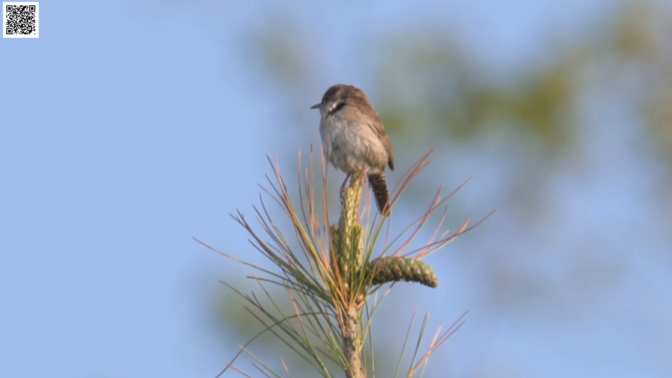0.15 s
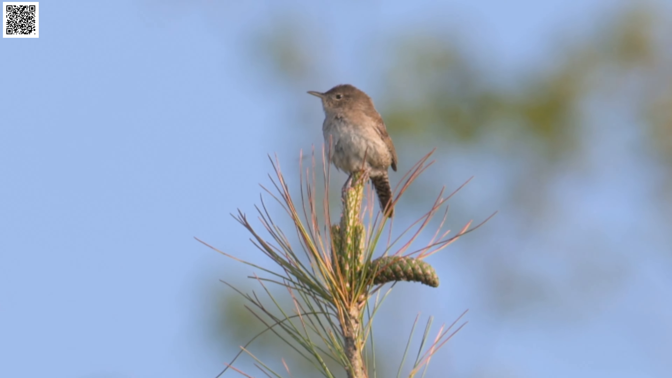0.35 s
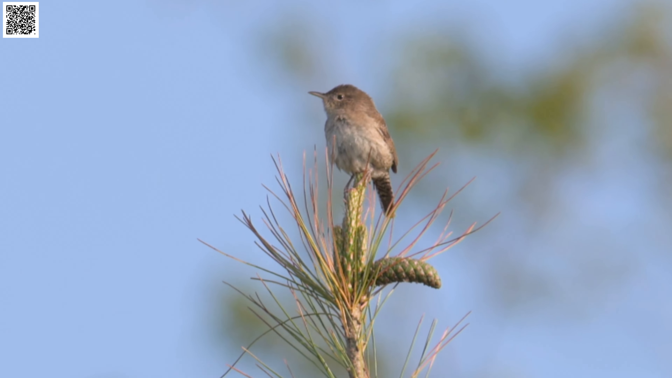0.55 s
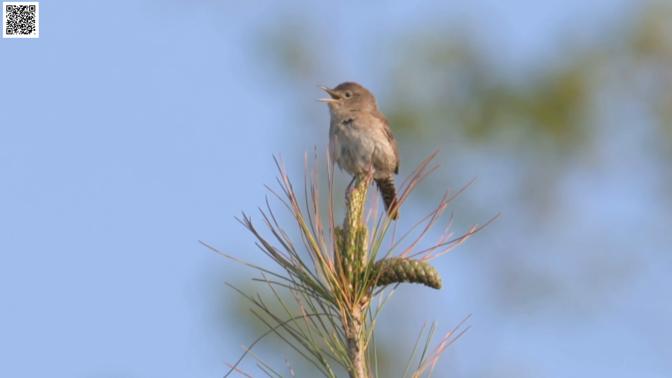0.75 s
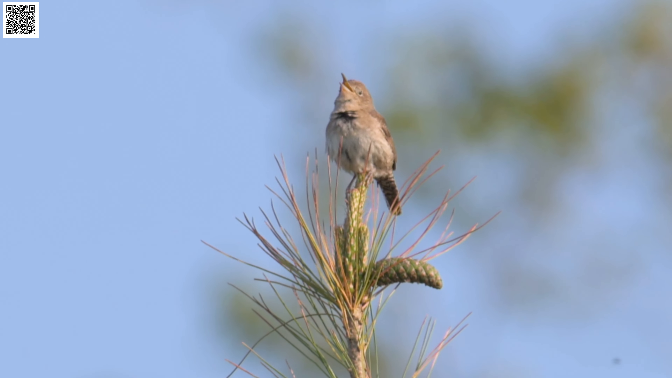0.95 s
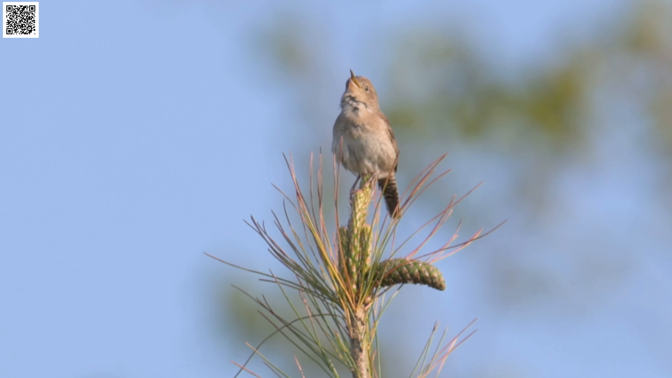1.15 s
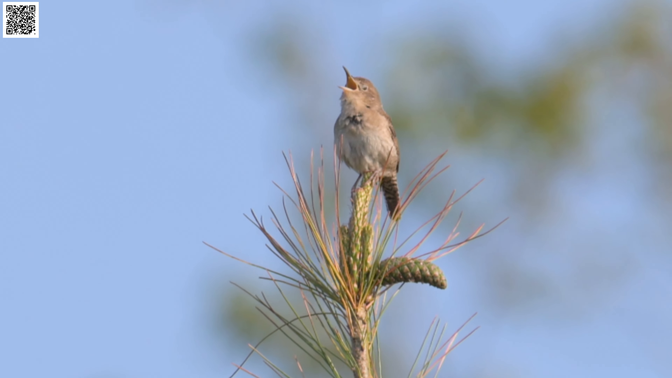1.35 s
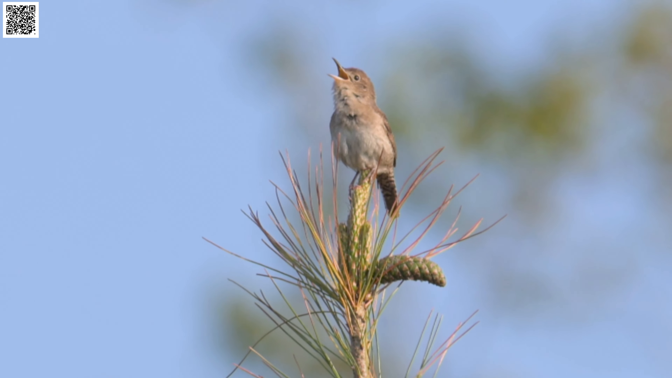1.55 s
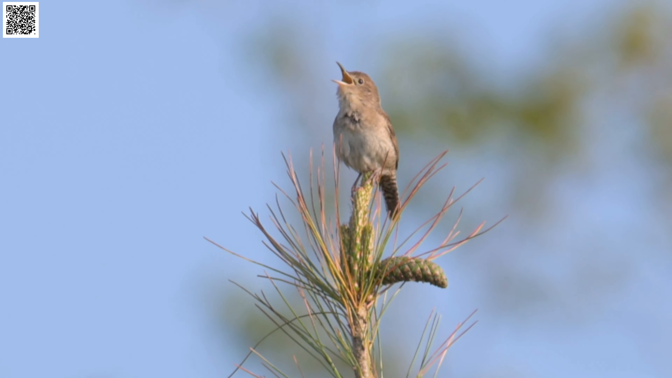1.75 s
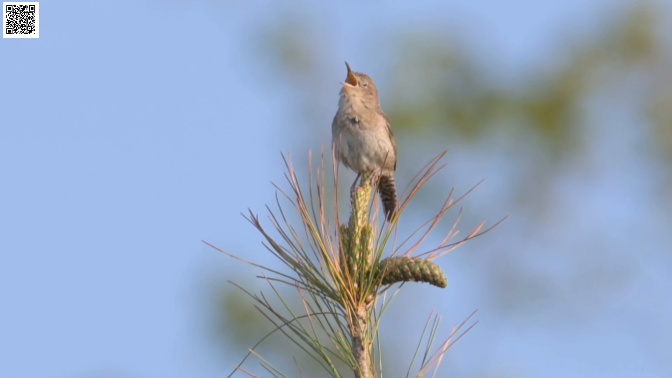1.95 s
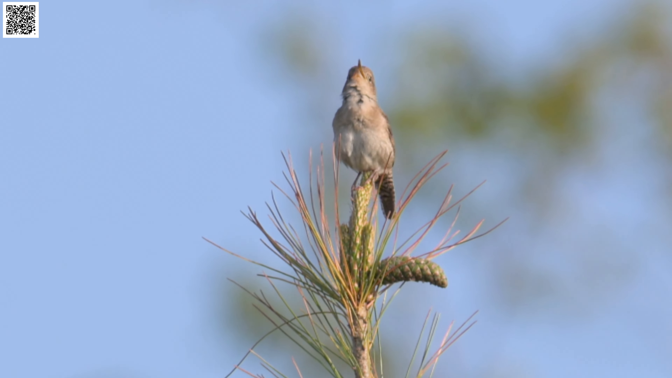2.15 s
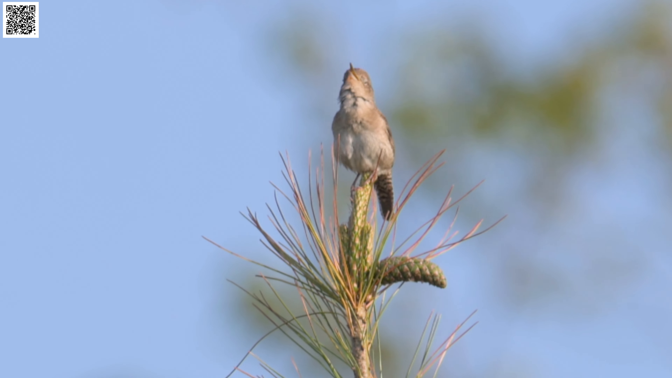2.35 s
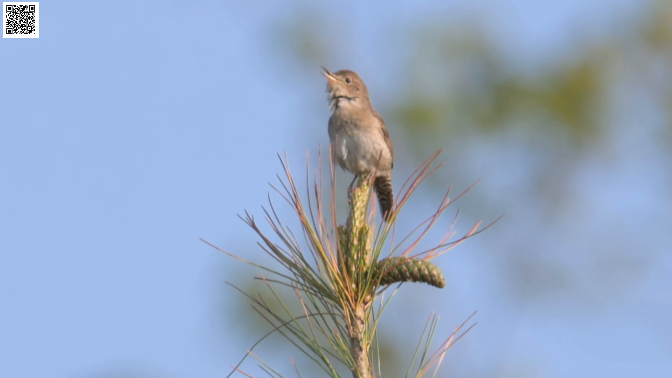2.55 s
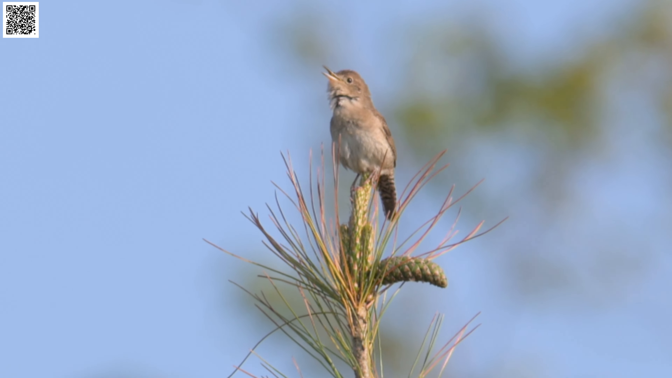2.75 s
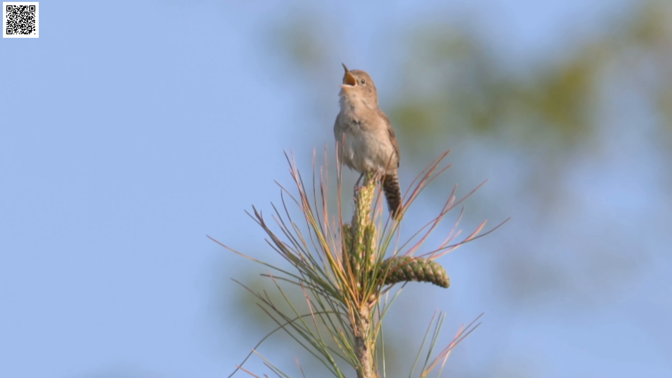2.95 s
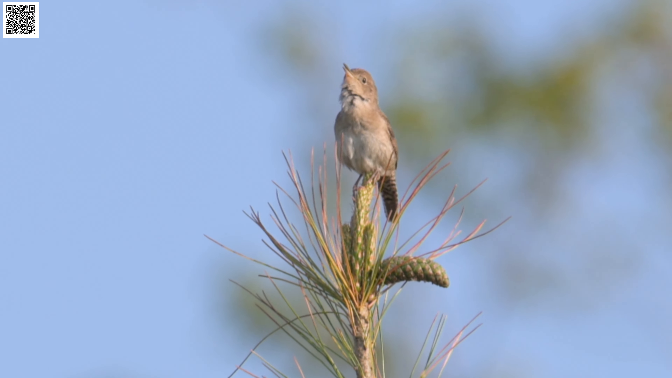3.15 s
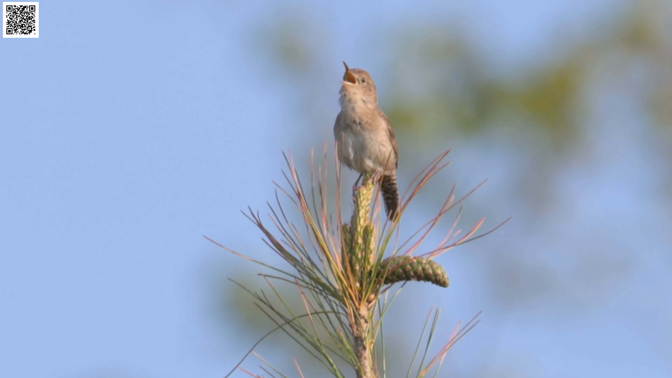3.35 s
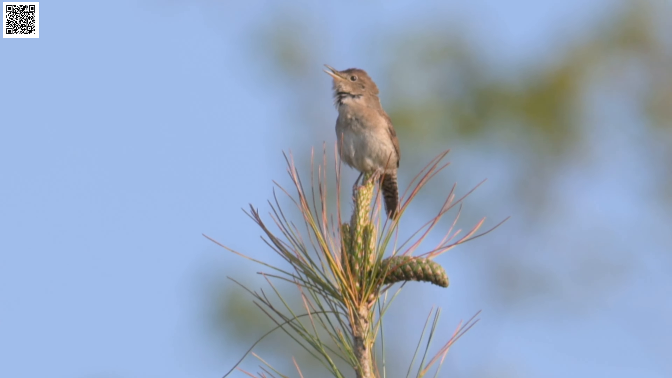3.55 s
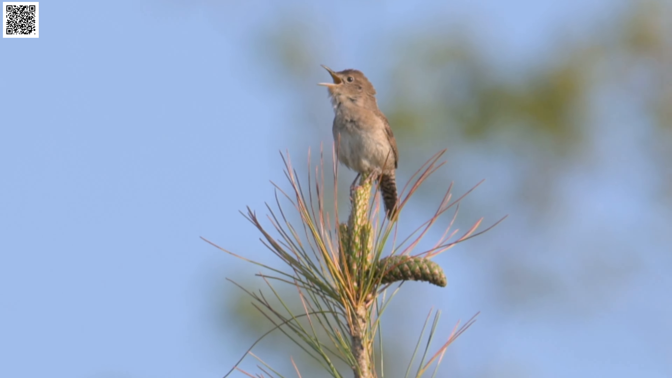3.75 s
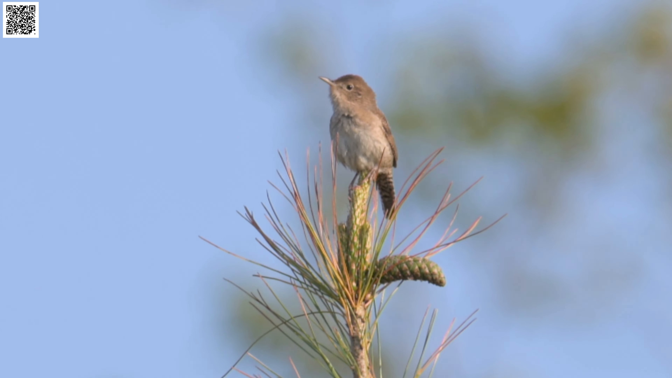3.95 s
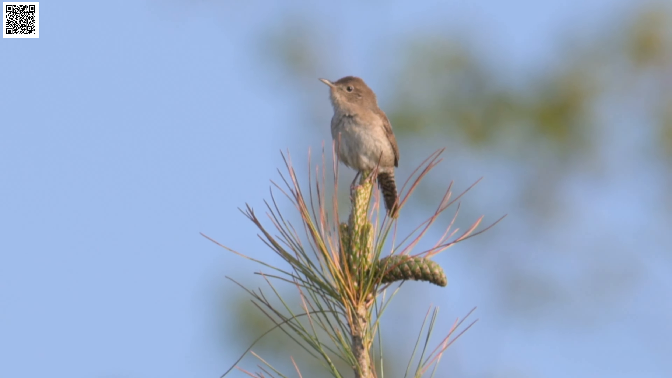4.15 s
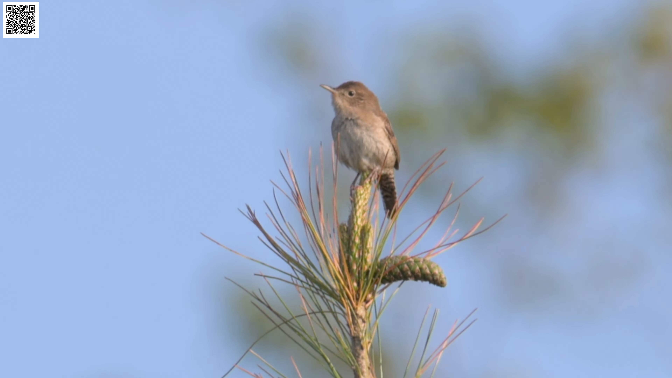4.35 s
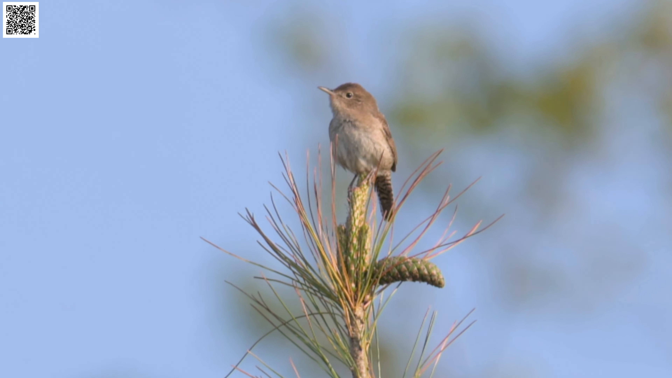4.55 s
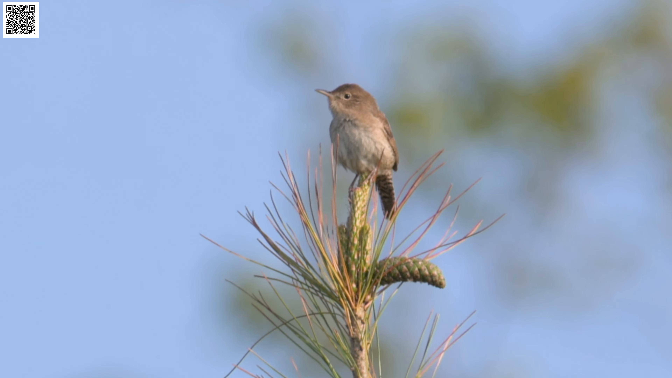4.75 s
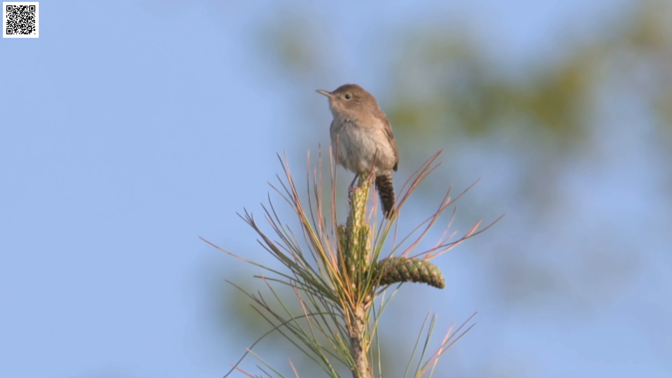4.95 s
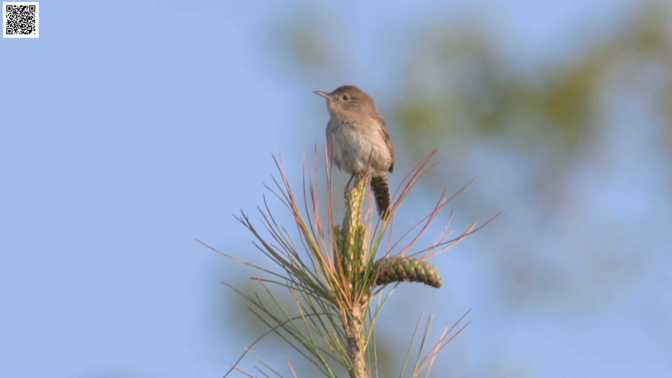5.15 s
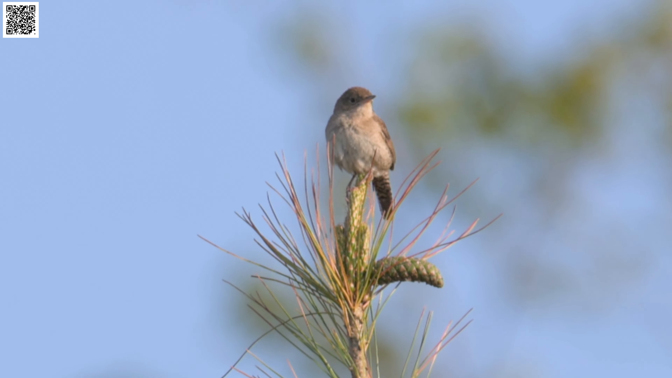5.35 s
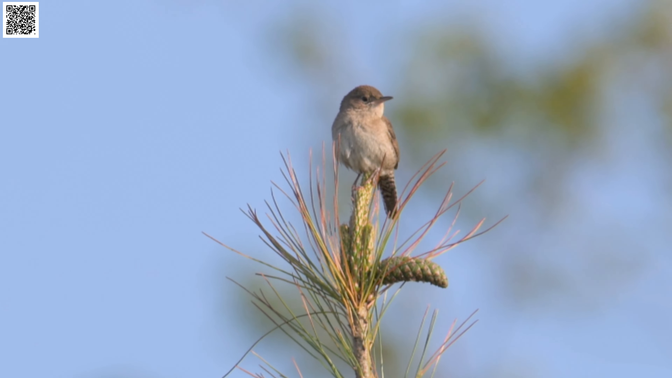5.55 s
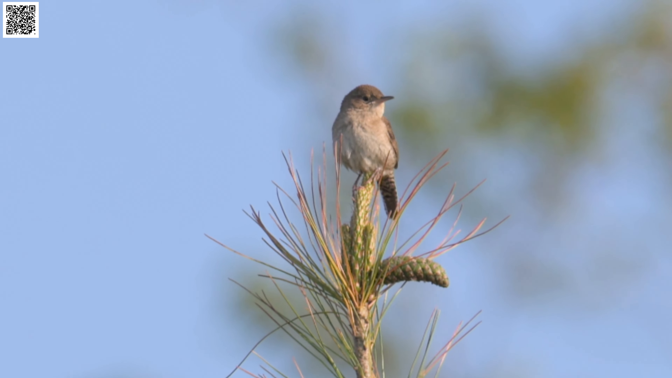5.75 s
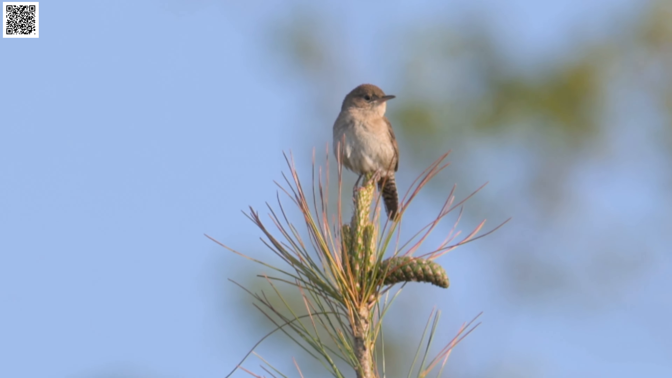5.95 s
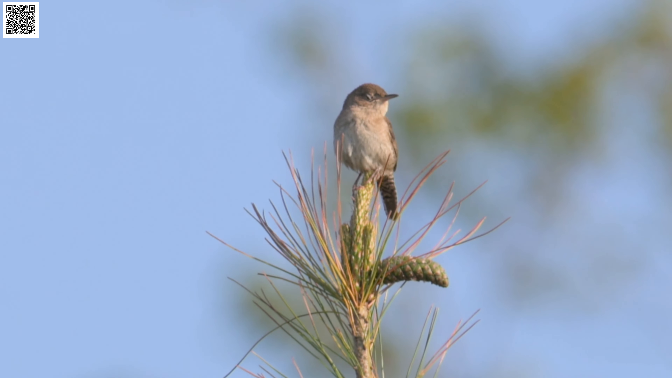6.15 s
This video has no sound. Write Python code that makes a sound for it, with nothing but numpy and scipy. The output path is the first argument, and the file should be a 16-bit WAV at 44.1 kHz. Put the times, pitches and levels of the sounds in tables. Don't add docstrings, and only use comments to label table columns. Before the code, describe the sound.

Outdoors, a nearby wren stutters, warbles, trills rapidly and ends in a two-note rattle; then faint birds, low hum and two wind thumps.

```python
import sys
import numpy as np
from scipy import signal
from scipy.fft import rfft, irfft
from scipy.io import wavfile
from scipy.ndimage import uniform_filter1d

SR = 44100
rng = np.random.default_rng(int(sys.argv[2]) if len(sys.argv) > 2 else 0)


def volts_from_decibels(level):
    exponent = np.asarray(level, float) / 20
    return 10 ** exponent


def generate_wav(signal):
    frames = np.transpose(np.atleast_2d(signal))
    scaled = np.clip(frames, -1, 1) * 32767
    pcm = np.round(scaled).astype(np.int16)
    wavfile.write(sys.argv[1], SR, pcm)


N = 273420

# time in seconds, hum level in dB.
TRAFFIC_LEVEL = [(0, -53.5), (1.5, -54), (3, -54), (4.2, -51), (5, -53), (6.2, -53.5)]
# frequency in Hz, density in dB per Hz.
AIR_SPECTRUM = [(82, -44), (140, -1.5), (188, -3.5), (258, 0.5), (475, -7), (639, -3), (985, -4.5),
                (1270, -9.5), (1610, -17), (2130, -23), (4240, -24.5), (7960, -33), (9510, -35),
                (10900, -32.5), (15600, -46)]
# frequency in Hz, side minus mid in dB.
AIR_WIDTH = [(120, -28), (250, -26), (500, -22), (900, -15), (1400, -2.5), (2500, 4), (12000, -0.5)]
# frequency in Hz, density in dB per Hz.
BUFFET_SPECTRUM = [(12, -51), (20, -12), (49, 0.5), (139, -4.5), (167, -11.5), (200, -23), (260, -82),
                   (440, -120)]
# time in seconds, level in dB.
GUST_LEVEL = [(0, -50), (.5, -52), (1.85, -52), (2.45, -49), (2.9, -52), (3.5, -53), (4.1, -52.5),
              (4.4, -52), (5.0, -53.5), (5.9, -51), (6.2, -48.5)]
# time in seconds, peak in dB, width in seconds, delay of the recoil in seconds.
KNOCKS = [
    (4.743, -34, .003, .007),
    (4.7905, -15.3, .0012, .0028),
    (4.806, -31, .002, -.005),
    (4.8435, -17.5, .0018, -.0035),
    (4.854, -34, .002, .0005),
    (1.952, -33, .0025, .006),
    (2.287, -35, .002, -.008),
    (.64, -33, .003, .007),
    (3.05, -33, .004, .009),
]

# start in seconds, length in seconds, start in Hz, end in Hz, level in dB.
FAR_FALLS = [(.287, .105, 7000, 3300, -61), (1.335, .065, 7700, 4600, -57), (1.475, .058, 7000, 4300, -51),
             (5.07, .057, 4230, 3970, -60), (3.95, .06, 4650, 3000, -66), (.5, .07, 3900, 2650, -69),
             (.793, .018, 7200, 6500, -62), (5.255, .04, 3100, 2750, -66), (5.822, .085, 6050, 3400, -57.5),
             (5.92, .045, 3500, 2800, -67), (4.595, .03, 3420, 3340, -67), (6.03, .062, 4200, 2700, -63),
             (4.92, .03, 5950, 5850, -69), (5.545, .022, 4450, 4000, -68), (5.565, .04, 7150, 6500, -69),
             (5.676, .012, 4000, 3700, -64), (5.808, .032, 3550, 2900, -68), (5.815, .025, 6750, 6300, -68),
             (6.03, .022, 6900, 6500, -69), (6.17, .03, 4000, 3200, -67)]
FAR_HOOKS = [(4.98, .045, 5550, 4800, -63), (5.115, .06, 6600, 4750, -64), (5.268, .068, 7400, 4500, -61.5)]
FAR_RISES = [(0, .02, 6050, 7100, -60), (.178, .038, 4100, 7200, -61), (.415, .028, 2900, 4100, -67),
             (4.382, .06, 5150, 5750, -64), (4.793, .012, 3200, 3400, -64), (5.255, .03, 3900, 4480, -65),
             (5.69, .035, 4400, 7100, -64), (4.035, .045, 3000, 3500, -70), (.58, .04, 2650, 3350, -69),
             (.81, .035, 2400, 2800, -65), (5.85, .022, 5500, 5700, -68), (1.045, .06, 6500, 7300, -64),
             (1.235, .03, 6200, 7000, -60)]
FAR_EASES = [(.345, .048, 4450, 5150, -60), (.292, .035, 5600, 6700, -62), (5.494, .03, 4400, 6300, -65),
             (.398, .045, 5900, 6200, -65)]
# start in seconds, length in seconds, both ends in Hz, turn in Hz, level in dB.
FAR_ARCHES = [(.228, .05, 5550, 4700, -62), (4.445, .045, 6300, 7050, -62), (4.757, .033, 2920, 2800, -62),
              (4.61, .07, 3800, 3950, -69), (5.155, .05, 3020, 3080, -69), (5.23, .035, 5650, 5850, -62),
              (5.62, .03, 5950, 5600, -65), (5.688, .087, 3900, 4060, -61), (.458, .022, 3300, 3450, -66),
              (.04, .08, 4900, 4920, -70), (5.08, .025, 5650, 5700, -67), (.87, .03, 3100, 3250, -69),
              (4.92, .018, 2700, 2950, -70)]
# seconds from start, pitch in Hz, level in dB.
LOOP_SHAPE = [(0, 3300, -68), (.02, 3600, -63), (.04, 4300, -61), (.055, 5100, -56), (.065, 5600, -57),
              (.073, 5300, -58), (.08, 4500, -57), (.088, 4000, -68)]
VEE_SHAPE = [(0, 5680, -63), (.008, 5708, -51.5), (.02, 5154, -53), (.032, 4799, -45), (.04, 5005, -55),
             (.055, 5803, -48), (.066, 6383, -54), (.09, 6275, -58.5), (.094, 6250, -73)]
VEE_TAIL_SHAPE = [(.095, 4100, -57), (.11, 4550, -52.5), (.125, 4855, -45.5), (.15, 4810, -70),
                  (.16, 4780, -70)]
SWOOP_SHAPE = [(0, 7900, -50), (.008, 7700, -43), (.018, 7000, -45), (.03, 6050, -43), (.042, 5550, -46),
               (.052, 5000, -46), (.066, 4400, -46), (.07, 4300, -60)]
WAVER_SHAPE = [(0, 3250, -66), (.01, 2880, -53), (.02, 2620, -58), (.028, 2500, -60), (.037, 2700, -61),
               (.046, 3000, -63), (.056, 2750, -63), (.065, 2950, -66)]
CURL_SHAPE = [(0, 3100, -64), (.012, 3334, -54.5), (.024, 3310, -59), (.034, 2880, -55), (.046, 2660, -57),
              (.06, 2510, -61), (.083, 2470, -62), (.092, 2900, -66)]
# seconds from start, pitch in Hz, level in dB, warble depth in Hz.
SEE_SHAPE = [(0, 8470, -75, 0), (.008, 8400, -46, 0), (.04, 7920, -39.5, 87), (.065, 7740, -47, 62),
             (.085, 7000, -36, -4), (.1, 6160, -42, 14), (.112, 6350, -68, 7)]
# start in seconds, level in dB, pitch factor.
LOOP_TIMES = [(.09, 1, 0.99), (5.397, -4, 1), (5.597, -2, .98)]
VEE_TIMES = [(.47, 0.11, 0.97), (.687, 1.3, 1), (0.898, 2.4, 1.001), (1.11, 2.4, 0.95)]
VEE_TAIL_TIMES = [(.47, 0.1, 0.99), (.687, 1.2, 1), (.905, 1.5, 0.97), (1.108, 3.0, 0.97)]
SEE_TIMES = [(3.775, -24, 0.94), (3.925, -11.5, 0.99), (4.082, -5, 1.019), (4.234, -4.5, 1.015)]
ONE_OFF_TIMES = [
    (4.836, 0, 1),
    (4.931, 0, 1),
    (1.606, 0, 1),
]

# start in seconds, level in dB.
STUTTERS = [(.753, -57), (.825, -53), (.903, -53)]
BUZZES = [(1.295, -46.5), (1.373, -44.5), (1.453, -43)]
# length in seconds, start, middle and end in Hz.
STUTTER_SHAPE = (.034, 850, 950, 680)
BUZZ_SHAPE = (0.028, 930, 855, 690)
# time in seconds, peak in dB, length in seconds.
PUFFS = [(.778, -62, 0.005), (.852, -59, .007), (.928, -58, 0.0064), (.98, -62, .005), (1.082, -63, 0.0074),
         (1.137, -56, .004), (1.177, -47, 0.0065), (1.305, -52, 0.012), (1.385, -48, 0.013),
         (1.464, -49, .011), (1.55, -54, .008), (1.635, -56, .008), (1.82, -57, .01), (1.945, -57, .01),
         (2.07, -57, .01), (2.426, -49, .002), (2.51, -53, .002), (2.552, -54, .002),
         (2.635, -46.5, 0.0018), (2.8, -55, 0.0018), (2.842, -51, .002), (2.918, -50, 0.009),
         (3.012, -50, .007)]
# start in seconds, length in seconds, start in Hz, end in Hz, level in dB.
CHATTER = [(.974, .04, 5900, 3900, -40)]
RASP = [(1.073, .022, 1150, 760, -50.5)]
CLEAR_NOTES = [(1.222, .014, 2300, 2250, -55), (1.232, 0.019, 2300, 3200, -46.5),
               (1.245, 0.0215, 3300, 3620, -39), (1.15, .03, 6550, 5800, -57),
               (1.544, 0.0107, 5100, 6900, -46), (1.546, .012, 3350, 3050, -45),
               (1.168, .012, 8800, 8100, -40), (1.142, .03, 13050, 12800, -67)]
SPLIT_NOTES = [(1.327, 0.022, 2850, 2680, -35), (1.398, 0.03, 2840, 2710, -32.5),
               (1.479, 0.03, 2820, 2600, -34)]
THIRDS = [(1.591, 0.037, 1090, 1850, -37), (1.549, 0.015, 1800, 1150, -34)]
# start in seconds, length in seconds, start, middle and end in Hz, level in dB.
HIGH_ARCH = [(1.138, 0.044, 9100, 10700, 8300, -55)]
SCOOPS = [(1.532, .014, 2480, 2660, 2500, -35), (1.628, .024, 2150, 2210, 1740, -30),
          (1.139, 0.041, 4250, 4330, 3700, -55)]
# seconds from start, pitch in Hz, level in dB.
HOOK_SHAPE = [(.002, 5650, -41), (.009, 5270, -33), (.013, 4480, -38), (.016, 4980, -37),
              (.02, 5650, -32.5), (.027, 6500, -28.5), (.033, 6940, -33), (.039, 7030, -37),
              (.043, 7300, -45)]
DIP_SHAPE = [(-.002, 5260, -59), (0, 5020, -48.5), (.004, 4010, -29), (.007, 3630, -24.5),
             (.012, 3230, -28), (.018, 2780, -32), (.021, 2650, -37.5), (.024, 2510, -61)]
STEP_UP_SHAPE = [(.002, 3816, -49), (.013, 3674, -25.5), (.016, 3336, -35), (.022, 3160, -47),
                 (.027, 4072, -27), (.0405, 4390, -22.5), (.042, 4950, -26), (.045, 5510, -40),
                 (.048, 5580, -37)]
# seconds from start, pitch in Hz, level in dB, warble depth in Hz.
HIGH_SLIDE_SHAPE = [(0, 8530, -62, 6), (.008, 8750, -60, 3), (.017, 9860, -55, 30), (.03, 9650, -48.5, 250),
                    (.045, 8500, -52, 480), (.063, 6900, -37, 500), (.076, 6300, -33, 350),
                    (.086, 6150, -38, 100), (.092, 5800, -64, 0)]
SHAKE_SHAPE = [(0, 5000, -54, 395), (.005, 5035, -36.5, 453), (.014, 4930, -30, 403),
               (.025, 5056, -28, 378), (.029, 4610, -25, 40), (.033, 4530, -28, 0), (.037, 4000, -25, -2),
               (.041, 3610, -38, 0), (.045, 3230, -41, 0)]
WARBLE_SHAPE = [(.002, 2895, -48, 9), (.009, 2846, -36, 58), (.013, 3146, -35, 195),
                (.022, 3224, -30.5, 297), (.03, 3360, -34, 351), (.034, 3004, -31, 19),
                (.038, 2650, -30, -2), (.042, 2226, -44, -24), (.046, 2037, -40, 0)]
# start in seconds, level in dB, pitch factor.
HIGH_SLIDE_TIMES = [(1.676, .3, 1)]
SHAKE_TIMES = [(1.7876, -2, 1.002), (1.9133, 0, 1), (2.037, 0.1, 1.006)]
HOOK_TIMES = [(1.85, 0.24, 1.003), (1.978, -0.18, 0.993)]
# start in seconds, level in dB.
TRILL_NOTES = [(2.1023, -3), (2.143, -1.5), (2.1836, -1.5), (2.2248, 0), (2.2647, 0.5), (2.3054, 0),
               (2.346, 0), (2.3856, -2.5), (2.427, 0), (2.467, -0.5), (2.509, -.6), (2.5513, 0),
               (2.5931, -0.5), (2.6335, -0.5), (2.674, -2), (2.716, -0.7), (2.756, -1), (2.7985, -0.5),
               (2.841, 0.5)]
# start in seconds, level in dB, pitch factor of the step, pitch factor of the warble.
RATTLE_NOTES = [(2.875, 0.5, 1.065, 1.064), (3.005, -0.3, 1.064, 1.034), (3.135, -0.4, 1.028, 1.014),
                (3.2672, -0.9, 0.98, 0.99), (3.3992, -0.7, 0.98, 1.014), (3.5328, -0.6, 0.992, .999),
                (3.6663, -2, 0.98, 0.98), (3.8014, -2.5, 0.96, .99)]
# time in seconds, left over right in dB.
HEAD_TURN = [(.7, -.2), (1.3, .5), (1.9, 1), (2.2, -.6), (2.8, -.8), (3.1, .2), (3.9, 0)]
# time in seconds, peak in dB, length in seconds.
HOUSING_TICKS = [(4.598, -51, .008), (5.358, -57, .006), (5.727, -47.5, .009), (5.811, -49.5, .008),
                 (6.095, -58, .003), (6.179, -50, .005)]


def at_hz(points, hz):
    table_hz, level_db = np.transpose(points)
    return np.interp(np.log(hz), np.log(table_hz), level_db)


def in_time(rows):
    s, value = np.transpose(rows)
    return np.interp(np.arange(N) / SR, s, value)


def rms_one(x):
    return x / np.sqrt(np.mean(x ** 2) + 1e-20)


def drift(rate_hz, size=N):
    return np.interp(np.arange(size) * rate_hz / SR, np.arange(size), rng.standard_normal(size))


def add(track, s, sound):
    i = max(round(s * SR), 0)
    track[i:i + len(sound)] += sound[:N - i]


def band(x, low_hz, high_hz, order=2):
    return signal.sosfilt(signal.butter(order, [low_hz, high_hz], "band", fs=SR, output="sos"), x)


def capsule(x, hz=11000, width_hz=2200, lift=1.6):
    r = np.exp(-np.pi * width_hz / SR)
    zeros = np.array([1, 0, -1]) * (1 - r * r) / 2
    poles = [1, -2 * r * np.cos(2 * np.pi * hz / SR), r * r]
    return x + lift * signal.lfilter(zeros, poles, x)


def placed(x, pan_db, lag):
    return np.array([np.roll(x, lag) * volts_from_decibels(pan_db / 2), x * volts_from_decibels(-pan_db / 2)])


def woodland(x, t60, gap_s):
    t = np.arange(int(.7 * SR)) / SR
    tail = rng.standard_normal((2, len(t))) * volts_from_decibels(-60 * t / t60) * np.clip(t / gap_s, 0, 1)
    tail /= np.sqrt(np.mean(np.sum(tail ** 2, axis=1)))
    return signal.fftconvolve(x[None], tail, axes=1)[:, :N]


def voice(hz, level_db, partials_db, rough):
    size = len(hz)
    hz = hz * (1 + 0.0084 * drift(320, size))
    phase = 2 * np.pi * np.cumsum(hz) / SR
    tone = 0
    for k, db in enumerate(partials_db(hz), 1):
        height = volts_from_decibels(db + rough * np.tanh(drift(397, size)))
        height = height * (k * hz < .45 * SR)
        tone = tone + height * np.sin(k * phase + 2 * np.pi * rng.random())
    return volts_from_decibels(level_db) * tone


def phrases(shape, events, warble_hz=0., partials_db=(0, -44, -41), rough=1.5):
    edge_s, beak_db_per_khz = .002, 7
    out = np.zeros(N)
    s, *columns = np.transpose(shape)
    t = np.arange(s.min() * SR, s.max() * SR) / SR
    hz, level_db, *depth = (uniform_filter1d(np.interp(t, s, c), size=45) for c in columns)
    tremor = sum(depth) * np.cos(2 * np.pi * warble_hz * (t - .003))
    path = hz + tremor
    level_db = level_db - 0.0025 * tremor
    middle = np.median(path)
    edges = np.clip(np.minimum(t - t[0], t[-1] - t) / edge_s, 0, 1)

    def beak(f):
        opening_db = beak_db_per_khz * (f - middle) / 1000
        return [db + (db < 0) * opening_db for db in partials_db]

    for start, db, factor, *sweep in events:
        sung = middle + (path - middle) * np.prod(sweep)
        add(out, start + s.min(), edges * voice(sung * factor, level_db + db, beak, rough))
    return out


def glides(rows, partials_db, rough=1.5, swell=0.52):
    out = np.zeros(N)
    for s, length, start_hz, middle_hz, end_hz, db in rows:
        u = np.linspace(0, 1, int(length * SR))
        bend = np.polyfit([0, .5, 1], np.log([start_hz, middle_hz, end_hz]), deg=2)
        hz = np.exp(np.polyval(bend, u))
        add(out, s, np.sin(np.pi * u).clip(0) ** swell * voice(hz, db, partials_db, rough))
    return out


def bent(rows, bend=0.):
    return [(s, length, a, np.sqrt(a * b) * (max(a, b) / min(a, b)) ** bend, b, db)
            for s, length, a, b, db in rows]


def arched(rows):
    return [(s, length, edge, turn, edge, db) for s, length, edge, turn, db in rows]


def air():
    out = 0
    edges = 110 * 2 ** np.arange(0, 7.3, 1 / 3)
    white = rng.standard_normal((2, 2, N))
    swell = in_time(TRAFFIC_LEVEL)
    swell = swell - swell.mean()
    for k, (low, high) in enumerate(zip(edges, edges[1:])):
        mid, side = band(white[k % 2], low, high)
        hz = np.sqrt(low * high)
        level_db = at_hz(AIR_SPECTRUM, hz) + 0.89 * drift(4.24)
        level_db = level_db + swell * (350 < hz < 1500)
        out = out + volts_from_decibels(level_db) * (mid + volts_from_decibels(at_hz(AIR_WIDTH, hz)) * side * [[1], [-1]])
    return volts_from_decibels(-49.5) * rms_one(capsule(out, width_hz=1500, lift=1.0))


def wind():
    surge_s, surge_from_db, surge_share = .055, -42, .52
    hz = np.arange(N // 2 + 1) * SR / N + 1
    lumps = rms_one(irfft(rfft(rng.standard_normal(N)) * volts_from_decibels(at_hz(BUFFET_SPECTRUM, hz)), N))
    now = np.arange(N) / SR
    surges = [surge_share * (db - surge_from_db) * np.exp(-((now - s) / surge_s) ** 2)
              for s, db, *_ in KNOCKS]
    level_db = in_time(GUST_LEVEL) + np.max(surges, axis=0) - 1.5 + 2.0 * drift(20)
    out = volts_from_decibels(level_db) * lumps
    t = np.arange(-.03, .03, 1 / SR)
    for s, db, width, recoil in KNOCKS:
        push = np.exp(-(t / width) ** 2)
        swing = push - .5 * np.exp(-((t - recoil) / (2 * width)) ** 2)
        add(out, s - .03, volts_from_decibels(db) * swing)
    return out


def wind_ports():
    push = wind()
    return push + volts_from_decibels(-52) * push * drift(90) * np.array([[1], [-1]])


def far_whistles():
    rows = bent(FAR_FALLS, -.06) + bent(FAR_HOOKS, -.24) + bent(FAR_RISES, .04)
    rows += arched(FAR_ARCHES) + bent(FAR_EASES, .25)
    far = volts_from_decibels(4.5 + 1.5 * drift(60)) * glides(rows, lambda hz: (0,), rough=3.0, swell=.6)
    far += phrases(LOOP_SHAPE, LOOP_TIMES, partials_db=(0,), rough=3.4)
    for shape, when in zip((WAVER_SHAPE, CURL_SHAPE, SWOOP_SHAPE), ONE_OFF_TIMES):
        far += phrases(shape, [when], partials_db=(0,), rough=3.0)
    return far


def neighbours():
    far = far_whistles()
    vee = phrases(VEE_SHAPE, VEE_TIMES, partials_db=(0,))
    vee += phrases(VEE_TAIL_SHAPE, VEE_TAIL_TIMES, partials_db=(0,))
    see = phrases(SEE_SHAPE, SEE_TIMES, warble_hz=58.5, partials_db=(0,))
    direct = placed(vee, -1.9, lag=8) + placed(volts_from_decibels(-5) * see, 6.0, lag=5) + placed(far, -.8, lag=-2)
    slap = volts_from_decibels(-17) * np.roll(see, round(.066 * SR))
    scatter = volts_from_decibels(1.5) * woodland(vee + volts_from_decibels(-8.5) * see, 0.42, 0.0032)
    return direct + slap + scatter + volts_from_decibels(-4.5) * woodland(far, 0.3, 0.0026)


def stutters(gravel):
    partials_db = (-40, -30, -10, -5, -18, -9, -4, -1, -10, -24, -28, -26)
    rows = [(s, *STUTTER_SHAPE, db) for s, db in STUTTERS]
    return gravel * glides(rows, lambda hz: partials_db, rough=5.0, swell=.9)


def chatter():
    pulses = .62 + .38 * np.sin(2 * np.pi * 95 * np.arange(N) / SR)
    notes = glides(bent(CHATTER, -.48), lambda hz: (0,), rough=3.0)
    return pulses * notes * (.7 + .8 * drift(1100) + .7 * drift(3200))


def rasp(gravel):
    notes = glides(bent(RASP), lambda hz: (-40, -30, -5, 0, -12, -18, -22), rough=6.0)
    return notes * (1.6 * gravel - .6)


def clear_notes(gravel):
    notes = glides(bent(CLEAR_NOTES, .1) + HIGH_ARCH, lambda hz: (0, -34), rough=3.5)
    return notes * (.5 + .5 * gravel)


def buzz_partials(hz):
    dulling_db = 0.1077 * (hz - BUZZ_SHAPE[2])
    top = [db + dulling_db for db in (-32, -29, -29, -31, -34)]
    return [-40, -40, -26, -9, -4, -24, -18, 0, 0, -10] + top


def buzzes(gravel):
    rows = [(s, *BUZZ_SHAPE, db) for s, db in BUZZES]
    return glides(rows, buzz_partials, rough=4.5, swell=.7) * (.2 + .8 * gravel)


def split_notes():
    rows = bent(SPLIT_NOTES, .45) + SCOOPS
    return glides(rows, lambda hz: (-22, 0, -31, -42, -48, -44), rough=3.5, swell=.8)


def thirds(gravel):
    rows = bent(THIRDS[:1], .22) + bent(THIRDS[1:], -.1)
    notes = glides(rows, lambda hz: (-40, -12, 0, -19, -44, -42, -40, -38), rough=3.5)
    return notes * (.6 + .4 * gravel)


def slurs():
    song = phrases(HIGH_SLIDE_SHAPE, HIGH_SLIDE_TIMES, warble_hz=142.4, rough=4.3)
    song += phrases(SHAKE_SHAPE, SHAKE_TIMES, warble_hz=146, partials_db=(0, -42, -45), rough=2.0)
    return song + phrases(HOOK_SHAPE, HOOK_TIMES)


def trill():
    s, db = np.transpose(TRILL_NOTES)
    fresh = np.exp(-(s - s[0]) / 0.1)
    pitch = .97 + (1.022 - .97) * fresh
    sweep = .98 + (.664 - .98) * fresh + .03 * rng.standard_normal(len(s))
    return phrases(DIP_SHAPE, zip(s, db, pitch, sweep), partials_db=(0, -52, -47), rough=.7)


def rattle():
    squeeze, warble_lag_s = -0.4, 0.07
    steps = [(s, db, factor, factor ** squeeze) for s, db, factor, _ in RATTLE_NOTES]
    warbles = [(s + warble_lag_s, db, factor) for s, db, _, factor in RATTLE_NOTES[:-1]]
    song = phrases(STEP_UP_SHAPE, steps)
    return song + phrases(WARBLE_SHAPE, warbles, warble_hz=115.4, partials_db=(0,), rough=3.1)


def wren():
    gravel = 1 + .45 * drift(2500)
    song = stutters(gravel) + chatter() + rasp(gravel) + clear_notes(gravel) + buzzes(gravel)
    song += split_notes() + thirds(gravel) + slurs() + rattle()
    breath = uniform_filter1d(np.abs(song), size=90) * rng.standard_normal(N)
    return song + trill() + volts_from_decibels(-34) * band(breath, 9500, 12000)


def singer():
    song = capsule(wren())
    low = signal.sosfilt(signal.butter(2, 5200, fs=SR, output="sos"), song)
    turn_db = in_time(HEAD_TURN)
    near = placed(low, turn_db, lag=0) + placed(song - low, turn_db + 4.0, lag=0)
    near += volts_from_decibels(-11.0) * woodland(song, 0.084, 0.0015)
    return near + volts_from_decibels(-18.5) * woodland(song, 0.94, 0.036)


def crackles(rows, body_db, top_db):
    out = np.zeros((2, N))
    for s, db, length in rows:
        size = int(2 * length * SR)
        burst = np.hanning(size) * rng.standard_normal((2, size))
        add(out.T, s - length, volts_from_decibels(db) * burst.T)
    top = band(out, 9500, 12400, order=3)
    return volts_from_decibels(top_db) * top + volts_from_decibels(body_db) * band(out, 4500, 9300)


def scene():
    mix = air() + wind_ports() + neighbours() + singer()
    mix += crackles(PUFFS, body_db=3.5, top_db=4.5)
    return mix + crackles(HOUSING_TICKS, body_db=-1.0, top_db=5.5)


def low_pass(x):
    return signal.sosfilt(signal.butter(12, 15850, fs=SR, output="sos"), x)


def record(dry):
    cut = signal.sosfilt(signal.cheby2(12, 70, 16600, fs=SR, output="sos"), dry)
    return low_pass(cut)


dry = scene()
out = record(dry)
generate_wav(out)
```